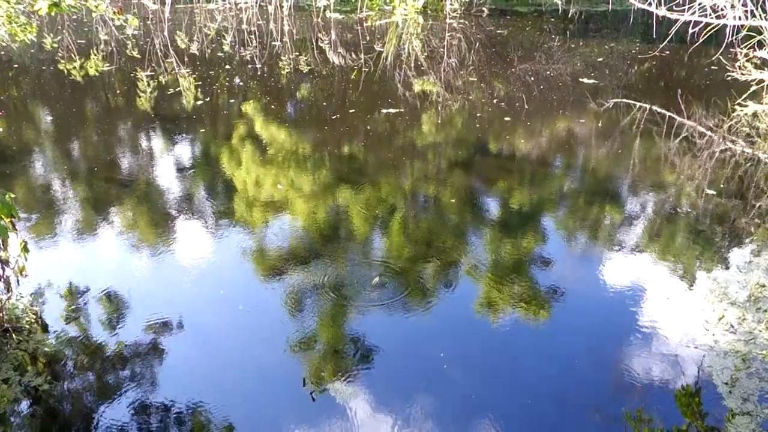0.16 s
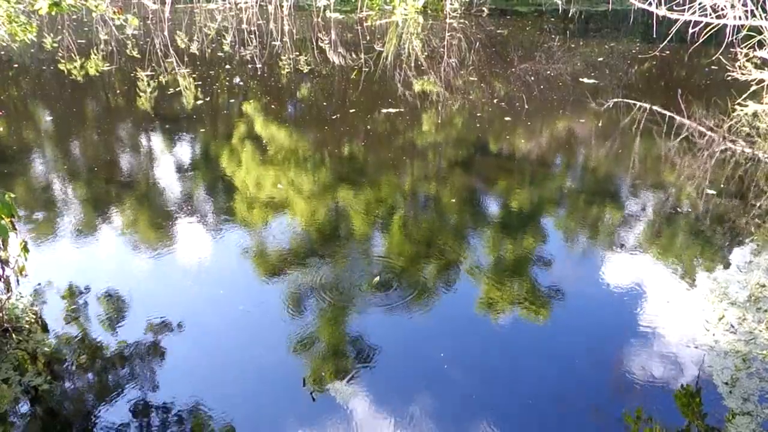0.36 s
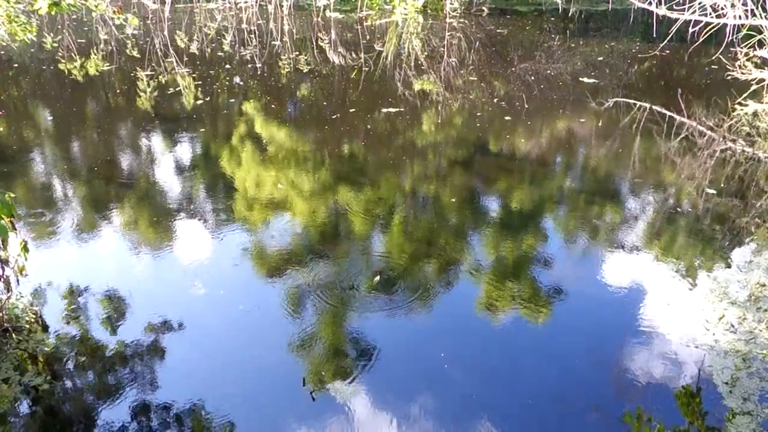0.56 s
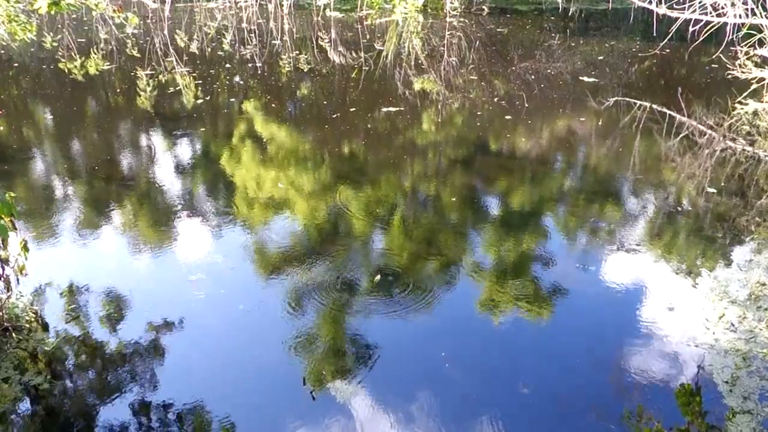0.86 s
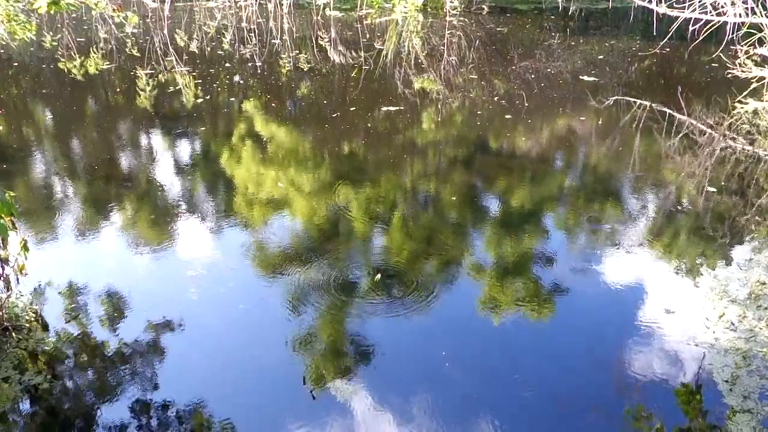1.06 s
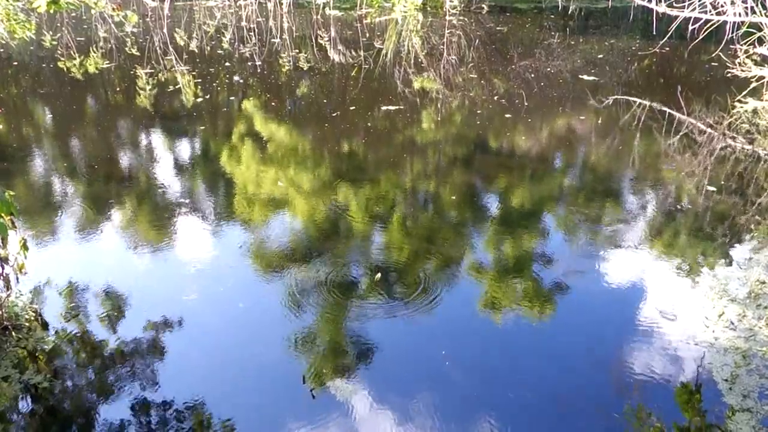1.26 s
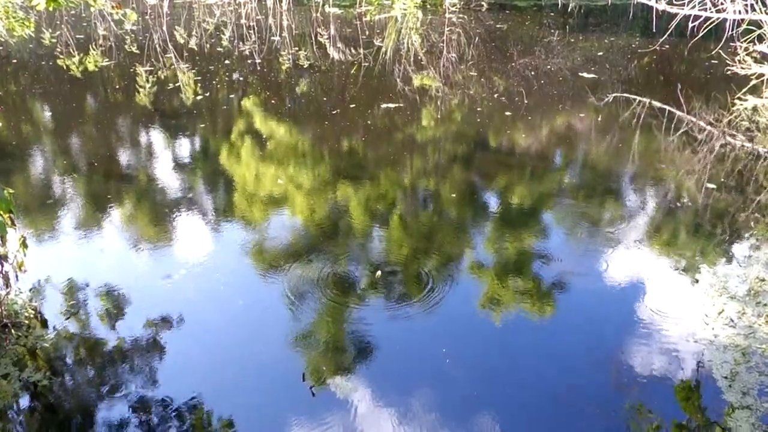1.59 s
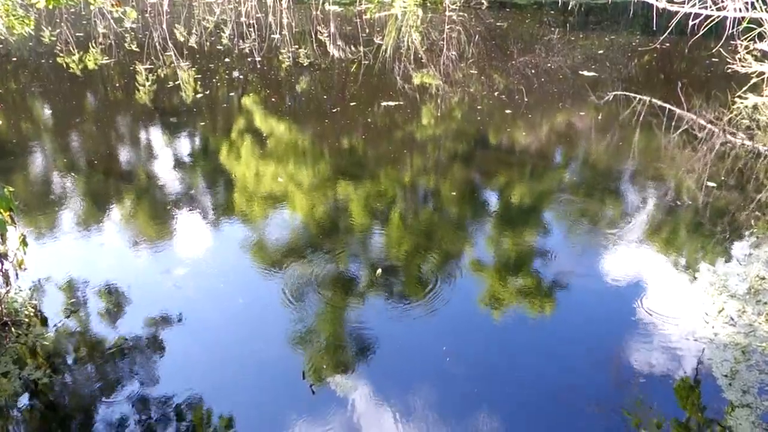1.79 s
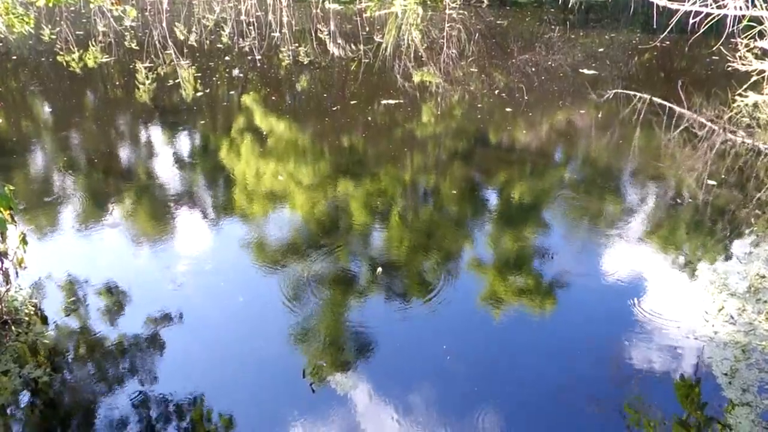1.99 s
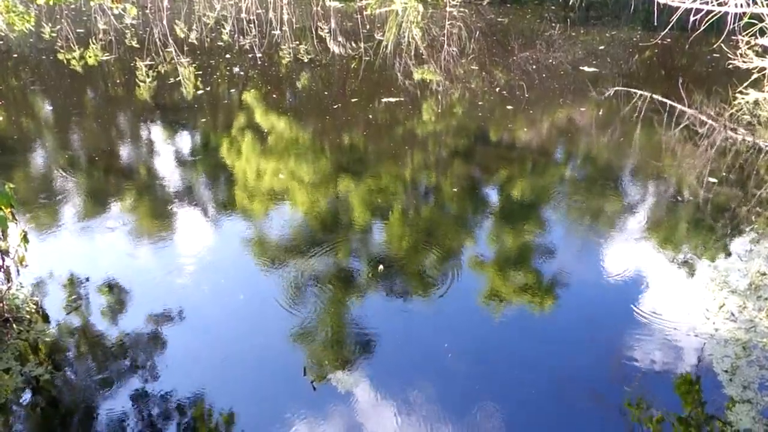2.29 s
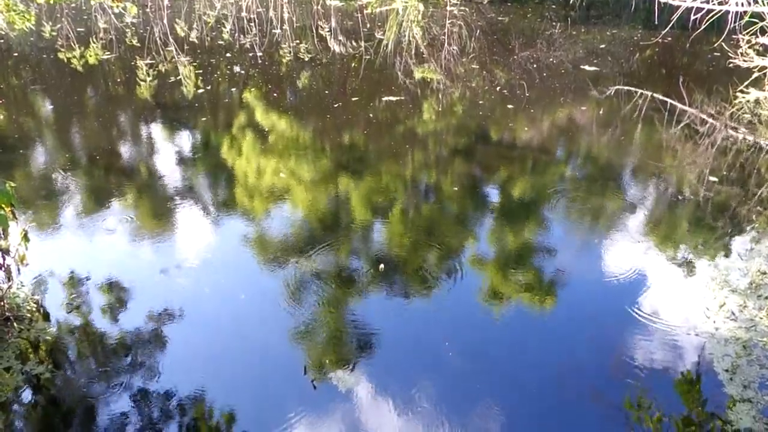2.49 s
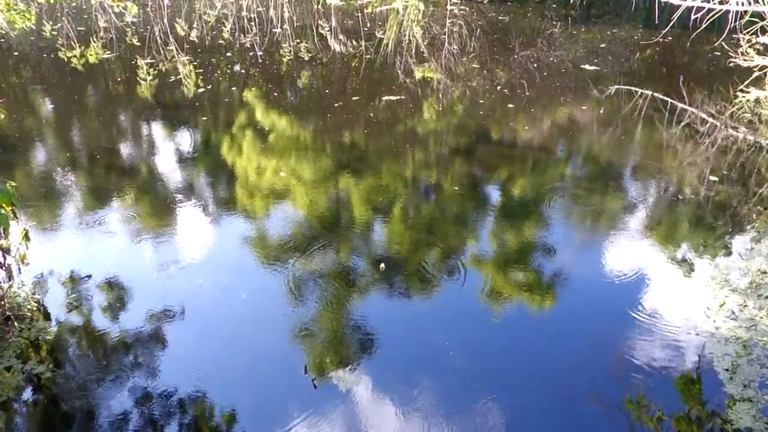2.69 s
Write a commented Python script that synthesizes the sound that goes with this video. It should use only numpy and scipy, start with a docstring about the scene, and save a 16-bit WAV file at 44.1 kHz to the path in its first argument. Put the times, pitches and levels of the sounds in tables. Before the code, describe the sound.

Bullfrogs croak in three low, throaty, overlapping bursts beside a pond, with birds whistling over insect hiss.

```python
"""Three bullfrogs croak over each other across a pond: pulse harmonics shaped by the vocal sac, drones beating.
Songbirds whistle in the trees as gliding, wavering tones with a diffuse echo.
A bush cricket buzzes as narrow-band noise modulated by its wing strokes.
A far insect chorus, rumble and hiss fill the air as patchy noise, partly coherent between the ears."""
import sys
import numpy as np
from scipy import signal
from scipy.fft import rfft, irfft
from scipy.io import wavfile
from scipy.ndimage import uniform_filter1d

SR = 44100
rng = np.random.default_rng(int(sys.argv[2]) if len(sys.argv) > 2 else 0)


def dump(signal):
    """Clip the signal to [-1, 1] and save it as 16-bit WAV at the path in sys.argv[1]."""
    limited = np.clip(np.atleast_2d(signal).T, -1, 1)
    pcm = np.round(limited * 32767).astype(np.int16)
    wavfile.write(sys.argv[1], SR, pcm)


def boost_factor(decibels):
    """Convert a level in decibels to a linear amplitude factor."""
    exponent = np.asarray(decibels, float) / 20
    return 10 ** exponent


N = 125685  # samples in the scene


def evened(x):
    """Normalization: scales to rms 1."""
    return x / np.sqrt(np.mean(x ** 2) + 1e-20)


def read(points, hz):
    """Spectral interpolation, linear in value along a log frequency axis."""
    f, value = np.transpose(points)
    return np.interp(np.log(hz + 1), np.log(f + 1), value)


def add(mix, s, sound):
    """Superposition: adds a sound into the mix at time s."""
    part = mix[:, round(s * SR):][:, :sound.shape[1]]
    part += sound[:, :part.shape[1]]


def ears(v, lean_db, lag):
    """Interaural level and time difference: left louder by lean_db and later by lag samples."""
    return np.array([np.roll(v, lag), v]) * boost_factor(lean_db / 2 * np.array([[1], [-1]]))


def drift(n, hz):
    """Low-passed noise: a random wander below hz, of rms 1."""
    lowpass = signal.butter(2, hz, fs=SR, output="sos")
    return evened(signal.sosfilt(lowpass, rng.standard_normal(n + 4000))[4000:])


def colour(x, gain):
    """Linear filtering: multiplies the spectrum of x by a gain."""
    return irfft(rfft(x) * gain, x.shape[-1])


def echoes(x, t60):
    """Diffuse reverberation from banks and trees: exponentially decaying noise, independent at each ear."""
    t = np.arange(SR // 2) / SR
    tail = rng.standard_normal((2, len(t))) * boost_factor(-60 * t / t60) * (t > .012)
    return signal.fftconvolve(x[None], tail / np.linalg.norm(tail[0]), axes=1)[:, :N]


def air():
    """Partly coherent noise field: rumble, far insect chorus and hiss, each band swelling by itself."""
    # spectrum of the air: f/Hz, relative level/dB
    spectrum = [(20, -79), (101, 0.5), (172, -11.5), (234, -5), (360, -10.5), (825, -29.5), (1400, -24.5),
                (2020, -32), (2900, -10.5), (4900, -11), (6500, -7.5), (7300, -11.5), (8100, -17),
                (10500, -18), (13900, -13), (16000, -28)]
    # swell of the bands: t/s, rumble level/dB, chorus level/dB, top level/dB
    swells = [(0, 5, 0.5, -3.5), (.6, 3, 2, -2), (.9, 5, 4, -5.5), (1.5, 3, 4.5, -5.5), (2.0, 1.9, 5, -4),
              (2.85, 3.5, 5.5, 1.5)]
    # likeness of the two ears: f/Hz, coherence (0 to 1)
    likeness = [(60, 0.96), (240, 1), (950, 0.4), (3770, 0.32), (15000, 0.082)]
    # phase by which the left ear leads: f/Hz, phase/rad
    phase_lead = [(1000, 0), (2330, -.1), (6800, -3), (9650, -3), (12700, -5.7), (15700, -6.5)]
    # level of left over right: f/Hz, level/dB
    left_over_right = [(240, 0.044), (3770, 0.44), (15000, -1.4)]
    air_db, patch_db = -41.5, 2.37  # overall rms level, rms of the patches

    frames, hz = N // 256 + 5, np.fft.rfftfreq(1024, 1 / SR)
    a, b, c, d, patches = rng.standard_normal((frames, 513, 5)).T
    patches = uniform_filter1d(patches, size=3, axis=0)  # smooth over frequency
    patches = evened(uniform_filter1d(patches, size=30, axis=1))  # and over time

    s, *swell = np.transpose(swells)
    low, mid, top = (np.interp(np.arange(frames) * 256 / SR, s, v) for v in swell)
    is_low, is_top = (hz < 1500)[:, None], (hz >= 7700)[:, None]
    band_db = is_low * low + ~(is_low | is_top) * mid + is_top * top

    same = np.clip(read(likeness, hz), -1, 1)[:, None]
    left = a + 1j * b
    right = same * left + np.sqrt(1 - same ** 2) * (c + 1j * d)
    right = right * np.exp(-1j * read(phase_lead, hz))[:, None]
    lean_db = read(left_over_right, hz)[:, None] / 2 * np.array([1, -1])[:, None, None]
    z = np.array([left, right])
    z *= boost_factor(read(spectrum, hz)[:, None] + patch_db * patches + band_db + lean_db)
    return boost_factor(air_db) * evened(signal.istft(z, nperseg=1024, noverlap=768)[1][:, :N])


def cricket():
    """Stridulation as amplitude modulation: wing strokes pulse a narrow high hiss at a steady rate."""
    # loudness of the buzz: t/s, level/dB
    loudness = [(0,-60),(.2,-56),(.68,-54),(.75,-70),(2.15,-82),(2.65,-72),(2.85,-66)]
    centre_hz, half_width_hz = 12550, 750  # half_width_hz: offset at which the amplitude halves
    strokes_per_s, stroke_at, depth = 55.4, .16, 1.4  # stroke_at: first peak, in cycles

    t, f = np.arange(N) / SR, np.fft.rfftfreq(N, 1 / SR)
    a, b = rng.standard_normal((2, N))
    ear_pair = np.array([a + 0.76 * b, a - 0.18 * b])  # partly alike
    hiss = colour(ear_pair, 1 / (1 + ((f - centre_hz) / half_width_hz) ** 4))
    beat = np.cos(2 * np.pi * (strokes_per_s * t - stroke_at))
    strokes = np.exp(depth * beat + 0.15 * drift(N, 22))
    return evened(hiss * strokes) * boost_factor(np.interp(t, *np.transpose(loudness)))


def near_song():
    """Additive synthesis: gliding notes of four partials, with frequency and amplitude modulation."""
    # one list per note: t/s, f/Hz, then level/dB of the 1st, 2nd and 3rd partial
    notes = [
        [(2.03,2182,-59,-37,-58),(2.06,2315,-69,-48.5,-53),(2.09,2718,-70,-42.5,-55.5),(2.24,2850,-45.5,-48,-53.5),(2.29,2725,-34,-51,-47.5),(2.33,2578,-50.5,-60,-46)],
        [(2.445,2368,-51,-46,-60),(2.465,2644,-42,-49,-54),(2.54,2569,-41.5,-60,-46.5),(2.6,2444,-64,-42,-50.5)],
        [(2.655,3000,-59,-50,-56),(2.69,3022,-45,-45,-58),(2.735,2804,-43.5,-49.5,-53.5),(2.85,2695,-42.5,-58,-49)],
    ]
    flutter_db, smear = 3.3, .3  # smear: rms phase shake per partial above the first, rad
    out = np.zeros((2, N))
    for note in notes:
        c = np.transpose(note)
        t = np.arange(c[0, 0], c[0, -1], 1 / SR)
        hz, *dbs = (np.interp(t, c[0], v) for v in c[1:])
        dbs.append(dbs[2] - 15)  # fourth partial, 15 dB under the third
        turns = np.cumsum(hz * (1 + .0035 * drift(len(t), 91))) / SR
        v = 0
        for k, db in enumerate(dbs, 1):
            gain = boost_factor(db + flutter_db * drift(len(t), 54.75))
            shake = smear * (k - 1) * drift(len(t), 100)
            v = v + gain * np.sin(2 * np.pi * k * turns + shake)
        v = np.sqrt(2) * v * signal.windows.tukey(len(t), .12)  # soft edges
        add(out, t[0], ears(v, -2.5, 1))
    return out


def whistles():
    """Frequency glides: short whistles on a parabolic pitch curve, roughened by noise modulation."""
    # glides: start t/s, length t/s, start f/Hz, middle f/Hz, end f/Hz
    glides = [(.121, .026, 5950, 5720, 5350), (.143, .095, 2900, 2850, 2450),
              (.312, .045, 2820, 2630, 2500), (.405, .045, 2760, 2620, 2500), (.515, .05, 2600, 2560, 2540),
              (.625, .04, 2580, 2540, 2480), (.802, .04, 2930, 2960, 2950), (.85, .035, 5800, 5500, 4900),
              (1.46, .04, 3300, 3350, 2600), (1.52, .03, 2900, 2980, 3050), (1.612, .072, 4650, 5900, 4700),
              (1.624, .057, 3650, 4180, 3450), (1.62, .045, 7500, 8300, 8500),
              (1.634, .022, 6950, 7100, 7000), (1.75, .14, 2550, 2350, 2300),
              (1.935, .055, 3500, 3250, 2400), (2.0, .03, 2700, 2800, 2900), (2.11, .12, 3800, 3840, 3960),
              (2.23, .12, 4050, 4150, 4200), (2.645, .09, 3950, 4620, 4300), (2.655, .07, 7300, 7700, 7750)]
    # one per glide: level/dB
    glide_db = [-42,-44,-45,-46,-50,-52,-48,-47,-49,-47,-38.5,-38,-50,-45,-55,-47,-46,-46,-48,-47,-46]
    waver, flutter_db, hoarse_db = .007, 3.3, -6  # waver: rms share of the pitch
    lag = 2  # samples by which a bird reaches the far ear later
    out = np.zeros((2, N))
    for (s, length, a_hz, b_hz, c_hz), db in zip(glides, glide_db):
        u = np.arange(0, 1, 1 / (length * SR))
        hz = 2 * (u - .5) * (a_hz * (u - 1) + c_hz * u) + 4 * b_hz * u * (1 - u)
        turn = 2 * np.pi * np.cumsum(hz * (1 + waver * drift(len(u), 150))) / SR
        hoarse = boost_factor(hoarse_db) * drift(len(u), 1500) * np.sin(1.3 * turn)  # hiss around 1.3 times the pitch
        v = (np.sin(turn) + hoarse) * signal.windows.tukey(len(u), .25)
        v = np.sqrt(2) * v * boost_factor(db + flutter_db * drift(len(u), 60))
        left = .14 < s < .7  # a bird on the left bank sings these, 8 dB louder on that side
        add(out, s, ears(v, 8 * left, -lag if left else lag))
    return out


def birds():
    """Direct and reverberant sound: songbirds' whistles, thrown back by the trees."""
    woods_db, woods_t60_s = -1.5, .7
    out = near_song() + whistles()
    return out + boost_factor(woods_db) * echoes(out.mean(0), woods_t60_s)


def frog(pitch, boom_db, treble_db, lag, third_db):
    """Source-filter principle: pulse harmonics and rasping air pass the vocal sac; jitter smears upper ones."""
    # response of throat and sac: f/Hz, level/dB
    sac = [(110, -36), (200, -3.5), (245, -4), (300, -2.5), (355, -11), (400, -16), (460, -22.5),
           (600, -31), (710, -21), (860, -55.5), (1000, -25), (1150, -27), (1360, -17.5), (1560, -26.5),
           (1780, -20), (2000, -26.5), (2200, -21.5), (2600, -31), (3200, -48)]
    jitter, scatter = .022, .45  # rms cycles: shake per harmonic number, fixed phase offset
    rasp_db, wobble_db = -8, 2.8

    s, pulse_hz = np.transpose(pitch)
    hz, db = (np.interp(np.arange(N) / SR, s, c) for c in (pulse_hz, boom_db))
    turns = np.cumsum(hz) / SR
    shake, spread = jitter * drift(N, 43.8), scatter * rng.standard_normal(26)
    treble = boost_factor(treble_db)
    f = np.fft.rfftfreq(N, 1 / SR)

    # air rasps on each pulse
    puffs = evened((0.28 + np.exp(-(turns % 1) / 0.25)) * rng.standard_normal(N))
    rasp = boost_factor(rasp_db) * treble * colour(puffs, boost_factor(read(sac, f)) * (f > 420))
    v = rasp * np.sqrt(SR / 4 / hz)  # relates noise density to the power of one harmonic
    for k in range(1, 26):
        loose = (k * shake + spread[k]) * (k > 2)
        tilt = treble if k > 4 else boost_factor(third_db * (k == 3))
        wobble = boost_factor(wobble_db * drift(N, 10.4) * (k > 2))
        v = v + boost_factor(read(sac, k * hz)) * tilt * wobble * np.cos(2 * np.pi * (k * turns + loose))
    v = np.sqrt(2) * boost_factor(db) * v
    return np.array([v, colour(v, np.exp(-2j * np.pi * f * lag / SR))])


def frogs():
    """Superposition and reverberation: three drones beat; the echo is alike in both ears, but wide in the treble."""
    # pitch of each frog: t/s, pulse rate f/Hz
    high_frog = [(0,118.1),(.08,123.5),(0.199,130),(0.279,119.6),(.4,117.1),(0.518,112),(.92,121.3),(1.05,121.7),(1.201,129.8),(1.28,131.5),(1.36,127.9),(1.5,128.5),(2.019,121.6),(2.201,127.7),(2.3,129),(2.4,134),(2.47,132.1),(2.65,125.3)]
    low_frog = [(0,107.7),(0.122,112.8),(0.199,115.1),(0.298,111),(0.399,112.7),(.5,110),(.98,112.8),(1.099,113.2),(1.2,114.5),(1.341,121.7),(1.421,117.4),(1.529,116),(1.982,113.2),(2.1,114.4),(2.22,115.9),(2.34,122.6),(2.46,115.3),(2.58,115.5)]
    far_frog = [(0, 111.5), (.35, 112.3), (0.599, 113.6), (0.799, 114.7), (1.0, 116), (1.251, 118),
                (1.6, 118.7), (1.749, 107.8), (1.899, 110.9), (2.021, 116.9), (2.551, 122.6), (2.85, 115)]
    # one list per frog (high, low, far), at its pitch times: boom level/dB
    booms = [
        [-49.5,-32.5,-34.5,-29,-52,-80,-55,-40,-32.5,-32.5,-34,-59.5,-49,-37,-33.5,-29.5,-39,-60],
        [-72,-49,-31,-40,-34,-55.5,-52,-44.5,-36.5,-33,-36,-52.5,-65,-40,-34,-31.5,-38,-72],
        [-44.5,-43.5,-58.5,-54,-45,-46.5,-61.5,-71,-51,-46,-50,-66.5],
    ]
    # one row per frog: treble level/dB, lag of the right ear/samples, third partial level/dB
    voices = [(-2.5, .5, -5), (-4, .73, -4), (6, 3, 4)]
    pond_db, treble_echo_db, pond_t60_s = -15, -10.5, 0.46

    dry = sum(frog(c, db, *v) for c, db, v in zip((high_frog, low_frog, far_frog), booms, voices))
    wet = echoes(dry.mean(0), pond_t60_s)
    f = np.fft.rfftfreq(N, 1 / SR)
    treble_wet = colour(wet, 1 / (1 + (600 / (f + 1)) ** 4))
    return dry + boost_factor(pond_db) * wet[0] + boost_factor(treble_echo_db) * treble_wet


def scene():
    """Superposition: air, cricket, birds and frogs sum at the two ears."""
    return air() + cricket() + birds() + frogs()


def roll_off(x):
    """The treble ends steeply here."""
    return signal.sosfilt(signal.butter(12, 16130, fs=SR, output="sos"), x)


def record(dry):
    """Two-channel pickup: the sound at the two ears is the finished mix."""
    return roll_off(dry)


dry = scene()
out = record(dry)
dump(out)
```